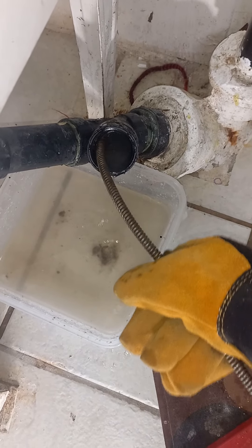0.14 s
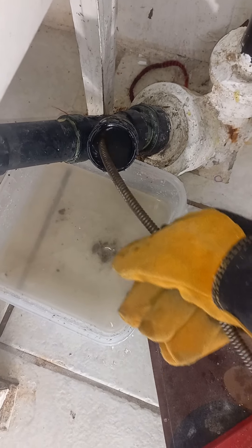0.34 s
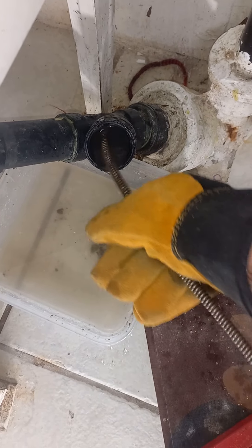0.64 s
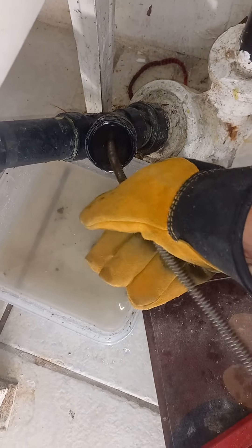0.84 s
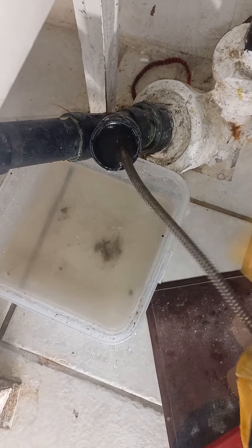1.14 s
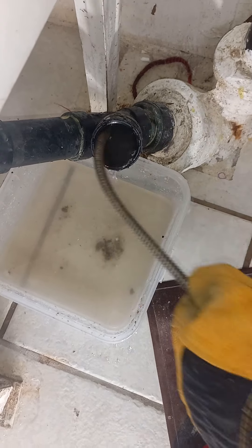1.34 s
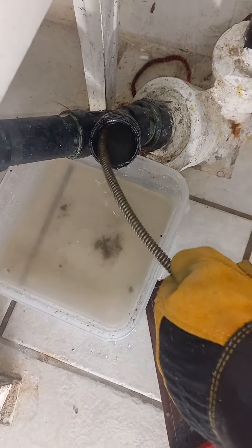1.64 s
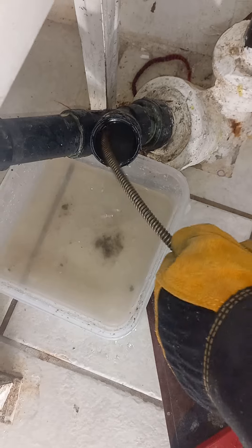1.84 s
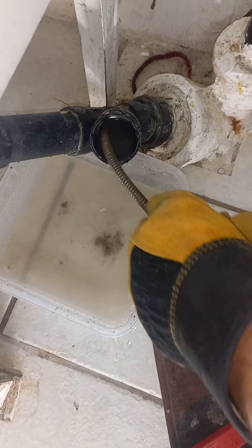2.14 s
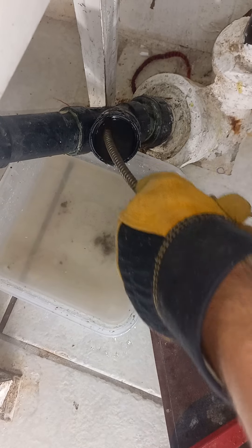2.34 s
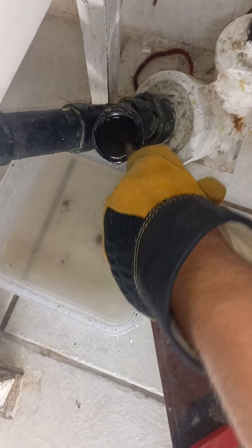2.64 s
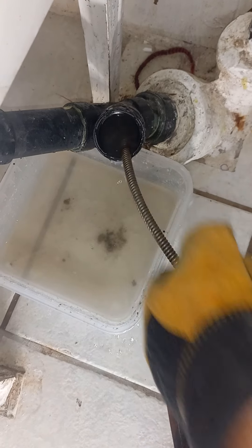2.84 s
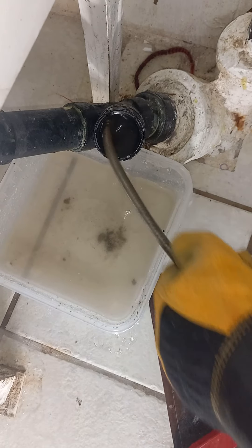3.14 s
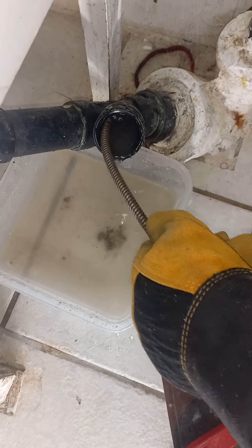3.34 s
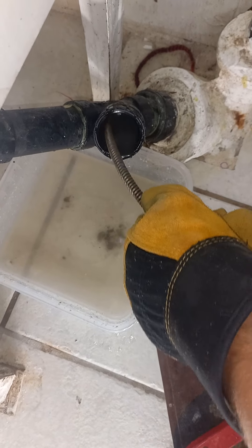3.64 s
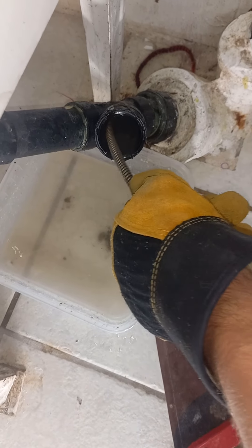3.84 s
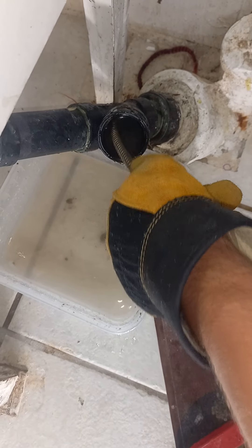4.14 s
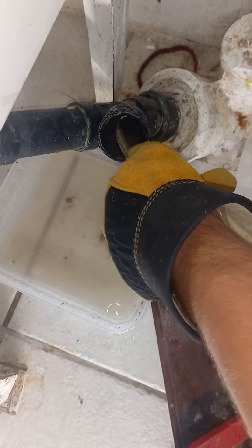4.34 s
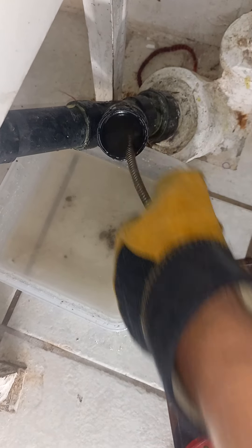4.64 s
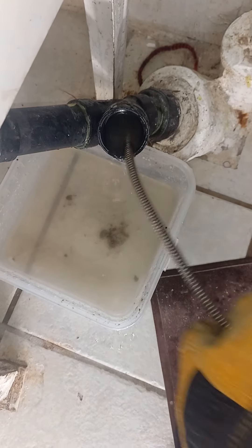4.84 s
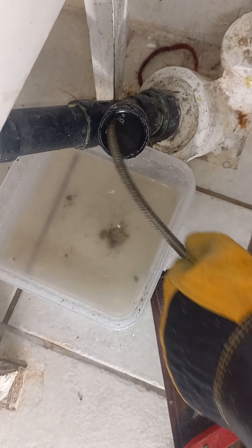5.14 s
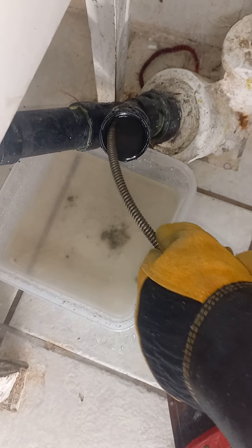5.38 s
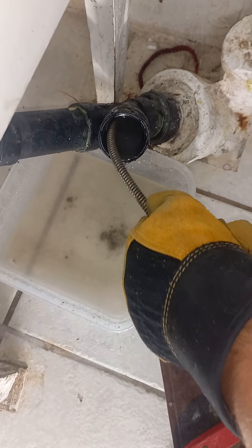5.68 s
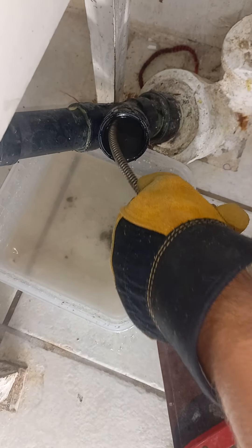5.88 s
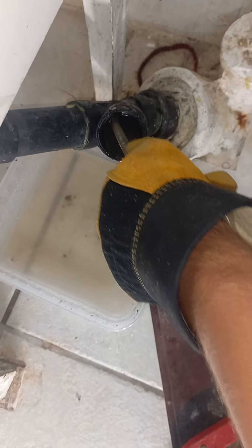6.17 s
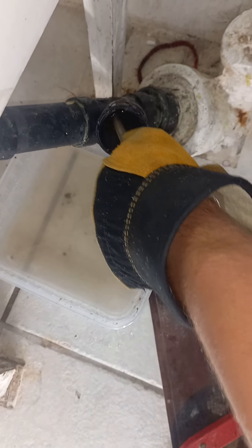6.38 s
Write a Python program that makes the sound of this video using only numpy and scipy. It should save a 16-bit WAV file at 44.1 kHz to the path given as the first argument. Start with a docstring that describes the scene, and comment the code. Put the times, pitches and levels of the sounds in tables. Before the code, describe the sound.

Metallic cable whipping against a hollow pipe mouth about five times a second, dull knocks deeper inside, motor humming, slapping pausing three times.

```python
"""A coiled steel cable, spun by an electric drain cleaner, whips and knocks in an open waste pipe.
About five times a second, with pauses, it slaps the pipe mouth: short noise bursts ring sets of resonances.
Deeper in, such bursts make knocks and floor thuds; random small contacts make the churn and chatter.
Three times the gloved hand moves back for a new grip, and fed coils rasp over the rim as rapid noise ticks.
Wavering sine tones and low noise make the motor and drum; a small tiled room adds short reflections."""
import sys
import numpy as np
from scipy import signal
from scipy.fft import rfft, irfft, next_fast_len
from scipy.io import wavfile
from scipy.ndimage import uniform_filter1d

SR = 44100
rng = np.random.default_rng(int(sys.argv[2]) if len(sys.argv) > 2 else 0)


def materialize(psi):
    """Save the field psi as 16-bit PCM at rate SR to the path in sys.argv[1].

    A 1-D psi becomes a single channel; in a 2-D psi each row is a channel.
    """
    bounded = np.clip(np.atleast_2d(psi).T, -1, 1)
    quanta = np.round(bounded * 32767).astype(np.int16)
    wavfile.write(sys.argv[1], SR, quanta)


N = 287091
TIME = np.arange(N) / SR
BINS = np.fft.rfftfreq(8192, 1 / SR)  # the frequencies at which every body's gain is given


def gain_of(db):
    """Turns decibels into a factor on the amplitude."""
    return 10 ** (np.asarray(db) / 20)


def evened(x):
    """Scales a signal to an rms (average strength) of 1."""
    return x / np.sqrt(np.mean(x ** 2) + 1e-20)


def read(points, hz):
    """Reads a curve between its points, along a logarithmic frequency axis."""
    point_hz, value = np.transpose(points)
    return np.interp(np.log(hz + 1), np.log(point_hz + 1), value)


def add(mix, s, sound):
    """Lays a stereo sound into the mix at time s, cut off where the mix ends."""
    part = mix[:, max(round(s * SR), 0):][:, :sound.shape[1]]
    part += sound[:, :part.shape[1]]


def wander(rate_hz):
    """Makes a slow random curve of rms 1 by smoothing noise above rate_hz."""
    t = np.arange(8192) / 1200
    hz = np.fft.rfftfreq(len(t), t[1])
    smooth = rfft(rng.standard_normal(len(t))) / (1 + (hz / rate_hz) ** 4)
    return np.interp(TIME, t, evened(irfft(smooth)))


def resonances(modes):
    """Gives the gain of a body at each frequency: one steep-sided peak per mode."""
    power = sum(gain_of(db) ** 2 / (1 + ((BINS - hz) / width) ** 2) ** 2 for hz, width, db in modes)
    return np.sqrt(power)


def struck(modes, spread_db):
    """Varies the mode levels at random: the place of a blow favours some and starves others."""
    return resonances([(hz, width, db + spread_db * rng.standard_normal()) for hz, width, db in modes])


def ring(x, gain):
    """Passes x through a body of energy 1 with the given gain; it rings only after it is pushed."""
    # folding the cepstrum gives the filter that responds as early as it can (minimum phase)
    cepstrum = irfft(np.log(np.maximum(gain / gain.max(), 1e-4)))
    folded = 2 * cepstrum[:len(BINS)]
    taps = irfft(np.exp(rfft(folded, len(cepstrum))))[:len(BINS)]
    taps = taps / np.linalg.norm(taps)
    size = next_fast_len(x.shape[1] + len(taps), True)
    return irfft(rfft(x, size) * rfft(taps, size), size)[:, :x.shape[1]]


def contacts(per_s, spread_db):
    """Scatters small impacts of uneven size, each with its own random sign at the two microphones."""
    size = gain_of(spread_db * np.minimum(rng.exponential(1, N), 3))
    happens = rng.random(N) < per_s / SR
    return evened(size * happens * rng.choice([-1, 1], (2, N)))


def skid(gain, rise_s, decay_s, length_s=.09):
    """Makes one blow: a quick noisy flurry of coil contacts rings a body; its strongest 5 ms have rms 1."""
    t = np.arange(round(length_s * SR)) / SR
    envelope = (1 - np.exp(-t / rise_s)) * np.exp(-t / decay_s)
    sound = ring(envelope * rng.standard_normal((2, len(t))), gain)
    sound /= np.linalg.norm(sound, axis=1, keepdims=True)
    strongest = uniform_filter1d((sound ** 2).mean(0), size=220).max()
    return sound / np.sqrt(strongest)


# Resonances of the bodies, also used further below: (frequency [Hz], half-width at half height [Hz], level [dB])
# air and wall of the drain, lower modes
PIPE_MODES = [(257.4, 23.3, -10.5), (360.9, 14.6, -0.5), (397, 13, -1), (439.7, 25.7, 1), (479, 14.4, 2)]
# air in the drain, upper modes
UPPER_PIPE_MODES = [(579, 27, -3), (599.4, 21, 0.5), (664.4, 22, -1.5), (748.6, 38, 1), (820, 45, -10)]
# the pipe mouth
MOUTH_MODES = [(1120, 220, -15), (1373, 35, -0.5), (1550, 75, -5.5), (1817, 75, 4.5), (1943, 29, 8),
               (2018, 34, 4.5), (2167, 111, 0.5)]
# the steel coil on the rim
RIM_MODES = [(2590, 260, -4), (2948, 15, 0), (3215, 92, -4), (3700, 350, -3), (4295, 180, -4.5),
             (4770, 560, -6.5), (5320, 205, -4.5), (6150, 270, -5), (6790, 400, -6.5)]
# colour of the dull bumps: (frequency [Hz], level [dB per Hz])
BUMP_COLOUR = [(60, -28.5), (120, -19), (190, -10), (245, -2.5), (315, -10.5), (380, -3), (470, -4.5),
               (540, -6), (750, -9), (900, -19.5), (1300, -44.5), (2500, -59)]
# colour of the fine rattle: (frequency [Hz], level [dB per Hz])
RATTLE_COLOUR = [(500, -21.5), (900, 4), (1300, -2), (2000, -6), (2450, -9), (3200, -8), (5000, -14.5),
                 (6500, -17), (8000, -34), (10000, -23), (15300, -17), (16300, -40)]
# cable tumbling far down the pipe, before trim and lurch: (time [s], bump level [dB], rattle level [dB])
CHURN_LEVELS = [(0.0, -34, -45), (0.61, -32.5, -43.5), (0.92, -33.5, -45), (1.34, -30.5, -40),
                (1.67, -32, -43), (2.63, -28, -38.5), (2.79, -31.5, -41), (3.06, -29, -42.5),
                (3.28, -29, -40.5), (3.57, -28.5, -43), (4.6, -31, -41), (5.15, -29.5, -41),
                (5.71, -30.5, -42), (6.24, -30, -41.5), (6.51, -32, -38)]
BUMPS_TRIM_DB, RATTLE_TRIM_DB, CHATTER_TRIM_DB = -0.5, 1, -5  # each layer against its level curve


def churn():
    """The long cable tumbles against the pipe wall: dense dull bumps and a fine rattle lurch together."""
    s, bumps_db, rattle_db = np.transpose(CHURN_LEVELS)
    lurch = wander(rate_hz=23.0)
    pipe = 1 + 1.2 * resonances(PIPE_MODES) + 0.34 * resonances(UPPER_PIPE_MODES)
    bumps = evened(ring(contacts(per_s=1500, spread_db=1.5), gain_of(read(BUMP_COLOUR, BINS)) * pipe))
    wall = 1 + 0.41 * resonances(MOUTH_MODES) + .5 * resonances(RIM_MODES)
    rattle = evened(ring(contacts(per_s=5000, spread_db=1.5), gain_of(read(RATTLE_COLOUR, BINS)) * wall))
    bumps_level = gain_of(np.interp(TIME, s, bumps_db) + BUMPS_TRIM_DB + 1.15 * lurch)
    rattle_level = gain_of(np.interp(TIME, s, rattle_db) + RATTLE_TRIM_DB + 2.9 * lurch)
    return bumps * bumps_level + rattle * rattle_level


def chatter():
    """Loose coils tick lightly on the pipe wall, in three sets that each wake their own mix of modes."""
    s, _, rattle_db = np.transpose(CHURN_LEVELS)
    ticks = np.zeros((2, N))
    for _ in range(3):
        touches = contacts(per_s=40, spread_db=6.5)
        wall = struck(MOUTH_MODES, spread_db=8.5) + 0.41 * resonances([(1160, 110, 0)])
        ticks += ring(touches, wall)
    return evened(ticks) * gain_of(np.interp(TIME, s, rattle_db) + CHATTER_TRIM_DB)


# tones of the motor and drum, before trim and wavering: (frequency [Hz], level [dB])
MOTOR_TONES = [(59.7, -68), (120, -53.5), (299, -42.5), (358.5, -43), (390, -38), (479, -36), (572.5, -55)]
# colour of the drum's even rumble: (frequency [Hz], level [dB per Hz])
DRUM_COLOUR = [(25, -30), (42, -29), (56, -1), (70, -5), (88, 4), (140, 0), (175, 0), (260, 0.5),
               (400, -31.5)]


def motor():
    """Hum and drum tones waver at random, as with the load on the cable, over the drum's even rumble."""
    # one shared, slightly uneven clock bends all the tones together
    clock = np.cumsum(1 + 0.0041 * wander(rate_hz=4.12)) / SR
    rumble = evened(ring(rng.standard_normal((2, N)), gain_of(read(DRUM_COLOUR, BINS))))
    out = gain_of(-47.0) * rumble
    for hz, db in MOTOR_TONES:
        phase = 2 * np.pi * (hz * clock + rng.random((2, 1)))
        level = gain_of(db - 4.0 + 4.67 * wander(rate_hz=21))
        out += np.sqrt(2) * level * np.sin(phase)
    return out


LIGHT_KNOCKS_PER_S, LIGHT_THUMP_DB, LIGHT_CLACK_DB, LIGHT_SPREAD_DB = 7, -27.5, -36, 2


def light_knocks():
    """Draws small knocks in the columns of HARD_KNOCKS: one at a random moment in each short stretch."""
    chance, thump, clack = rng.random(80), rng.standard_normal(80), rng.standard_normal(80)
    s = (np.arange(len(chance)) + chance) / LIGHT_KNOCKS_PER_S
    thump_db = LIGHT_THUMP_DB + LIGHT_SPREAD_DB * thump
    clack_db = LIGHT_CLACK_DB + LIGHT_SPREAD_DB * clack
    rows = np.transpose([s, thump_db, clack_db])
    return list(rows[s < N / SR])


# the cable knocks hard inside the pipe; levels before the trims below:
# (time [s], level of the air column's thump [dB], level of the wall's clack [dB])
HARD_KNOCKS = [(0.045, -20.5, -50), (0.131, -12, -23.5), (0.328, -17, -25), (0.507, -17.5, -24.5),
               (0.527, -15, -24.5), (0.663, -21, -33), (0.738, -19, -31), (0.918, -24, -42),
               (0.936, -18.5, -29), (1.081, -18, -26), (1.14, -20.5, -33), (1.287, -13, -30),
               (1.342, -19, -24.5), (1.475, -21.5, -29), (1.516, -16, -49), (1.728, -12.5, -21.5),
               (1.923, -14, -37), (2.078, -16, -32), (2.157, -24, -25), (2.304, -15.5, -34),
               (2.492, -15, -24), (2.572, -13, -19), (2.644, -27, -28.5), (2.718, -15.5, -21),
               (2.931, -18.5, -38), (3.096, -10.5, -21), (3.245, -34, -28.5), (3.294, -15, -25),
               (3.339, -12, -32), (3.365, -18, -25), (3.495, -16, -29), (3.57, -16, -20.5),
               (3.725, -16.5, -27.5), (3.766, -18.5, -26), (3.904, -14, -24.5), (3.935, -10, -24.5),
               (4.116, -14.5, -30.5), (4.323, -13.5, -18.5), (4.379, -16, -24.5), (4.576, -16, -18),
               (4.612, -29, -26), (4.666, -35, -28), (4.748, -19.5, -34.5), (4.938, -13, -31),
               (5.115, -15, -21), (5.168, -15.5, -28), (5.35, -13.5, -30.5), (5.378, -12.5, -33),
               (5.55, -16.5, -44), (5.588, -18, -45), (6.187, -23, -35), (6.385, -16, -25),
               (6.409, -42, -17.5)]
# the upper air modes lie between thump and clack (share 0-1), then get a trim
HOLLOW_DB, HOLLOW_FROM_CLACK = -3.5, 0.34


def knocks():
    """Blows deeper in the drain ring the air column; the pipe wall clatters and the cable bounces once."""
    out = np.zeros((2, N))
    broad = resonances([(976, 284, 1.5), (2610, 660, -7.5), (5860, 2000, -17.5)])
    for s, thump_db, clack_db in list(HARD_KNOCKS) + light_knocks():
        air = struck(PIPE_MODES, spread_db=2.5) + 0.083 * resonances([(380, 138, 0)])
        thump = skid(air, rise_s=0.00058, decay_s=0.0025)
        hollow_db = HOLLOW_DB + thump_db + HOLLOW_FROM_CLACK * (clack_db - thump_db)
        hollow = skid(struck(UPPER_PIPE_MODES, spread_db=2), rise_s=0.00029, decay_s=.003)
        add(out, s - .003, gain_of(thump_db - 4) * thump + gain_of(hollow_db) * hollow)

        wall = struck(MOUTH_MODES, spread_db=7.0) + gain_of(-1.5) * broad
        wall = wall + gain_of(-24.0) * struck(RIM_MODES, spread_db=8.5)
        clack = gain_of(clack_db + 1.04) * skid(wall, rise_s=0.00028, decay_s=0.0062)
        add(out, s - .0005, clack)
        # the bounce is softer, with left and right swapped
        add(out, s + rng.uniform(.008, .022), gain_of(-9.5) * clack[::-1])
    return out


# colour of the sizzling coils: (frequency [Hz], level [dB per Hz])
SIZZLE_COLOUR = [(3000, -56), (5500, -42), (7000, -17.5), (8000, -14), (9400, -10), (10100, -7.5),
                 (11400, -12), (12300, -5), (13200, -1.5), (14400, -6), (15100, 2), (15550, 0),
                 (15950, -17), (16600, -30)]
SIZZLE_DB = -3.5  # sizzle of the coils against the level of the slap
CLACK_DB, RING_DB, RIM_HIT_RING_DB = -26.5, -20.5, -4  # at a usual slap; a rim hit rings the mouth less
# a harder slap is brighter: rim and mouth gain less than the sizzle (dB per dB above a usual slap)
USUAL_SLAP_DB, CLACK_SLOPE, RING_SLOPE = -18, .65, 0.79
SKID_LENGTH, SKID_SHORTER_PER_DB = 0.79, 0.09  # factor on decay at a usual slap; a harder one is shorter


def slap(sizzle_db, square_db, ring_db):
    """The cable skids on the rim: coils sizzle, the rim clacks, the pipe mouth rings."""
    out = np.zeros((2, SR // 7))
    force_db = sizzle_db - USUAL_SLAP_DB
    length = np.clip(SKID_LENGTH - SKID_SHORTER_PER_DB * force_db, .5, 2)
    # each touch falls on another stretch of coils, with its own colour
    spot_db = np.interp(BINS, np.linspace(0, SR / 2, 24), rng.normal(0, 2.2, 24))
    coils = gain_of(read(SIZZLE_COLOUR, BINS) + spot_db)
    sizzle = gain_of(sizzle_db + SIZZLE_DB) * skid(coils, rise_s=0.0011, decay_s=0.006 * length)
    rim = struck(RIM_MODES, spread_db=3.5)
    clack_level = gain_of(CLACK_DB + CLACK_SLOPE * force_db + square_db)
    clack = clack_level * skid(rim, rise_s=0.0031, decay_s=0.0086 * length)
    mouth = struck(MOUTH_MODES, spread_db=3)
    mouth_level = gain_of(ring_db + RING_SLOPE * force_db)
    mouth_ring = mouth_level * skid(mouth, rise_s=0.00089, decay_s=0.01 * length)
    add(out, 0, sizzle + clack + mouth_ring)
    # the springy cable touches once more, more dully, with left and right swapped
    bounce_s, bounce_db = rng.uniform(.014, .034), rng.normal(-17.5, 7)
    bounce = (0.14 * sizzle + clack + mouth_ring)[::-1]
    add(out, bounce_s, gain_of(bounce_db) * bounce)
    return out


# glancing slaps on the pipe mouth, and three light coil ticks before the first pull:
# (time [s], level before the sizzle trim [dB], extra ring of the pipe mouth [dB])
MOUTH_TOUCHES = [(0.1369, -19.5, -0.5), (0.3025, -20.5, -2), (0.5502, -16, -5.5), (1.165, -33.5, -9),
                 (1.2055, -34.5, -10), (1.2378, -27.5, -4), (1.4729, -18.5, -0.5), (1.6936, -20.5, -1),
                 (1.9019, -19, -1), (2.0903, -14, 0.5), (2.2919, -17, -1), (2.5019, -17, -1),
                 (3.0919, -20, 3.5), (3.2992, -17.5, -4), (3.483, -14, 0.5), (3.5977, -23, -4),
                 (3.699, -15.5, -2), (3.895, -18, -4), (4.0956, -18, -4.5), (4.3051, -18.5, -5.5),
                 (5.102, -17, 1), (5.293, -22, 6), (5.4931, -14, 1), (5.697, -17.5, 0), (5.896, -18.5, -3),
                 (6.0969, -15.5, 0.5), (6.303, -18, -1), (6.5044, -18, 1)]
# mostly some 60 ms later it swings back and lands more squarely on the rim;
# a few faint later touches and one extra hard hit near the end:
# (time [s], level before the sizzle trim [dB], extra clack of the rim [dB])
RIM_HITS = [(0.347, -18, 0), (1.5574, -17.5, -2), (1.7472, -22.5, -3), (1.963, -23, -2.5),
            (2.217, -33, -4.5), (2.3603, -22, 2.5), (2.4254, -32.5, -3), (2.5625, -18.5, 4.5),
            (3.3558, -29.5, 1), (3.559, -14, 0.5), (3.7396, -26, 3), (3.9569, -20.5, 3), (4.1628, -19, 4),
            (4.2232, -34.5, 0), (4.3678, -16.5, 4), (5.242, -30.5, -3), (5.3634, -13, -1), (5.5637, -12, 3),
            (5.7556, -28.5, 3.5), (5.9663, -18, -0.5), (6.1723, -21, 0), (6.361, -21.5, -3),
            (6.4081, -12.5, 10)]


def slaps():
    """The cable gives glancing, ringing slaps and a few light ticks on the pipe mouth, and drier rim hits."""
    out = np.zeros((2, N))
    for s, db, extra_ring_db in MOUTH_TOUCHES:
        add(out, s - .0007, slap(db, 0, RING_DB + extra_ring_db))
    for s, db, extra_clack_db in RIM_HITS:
        add(out, s - .0007, slap(db, extra_clack_db, RING_DB + RIM_HIT_RING_DB))
    return out


# the slack cable flops on the floor: (time [s], level before a trim [dB], pitch of the boom [Hz])
FLOOR_THUDS = [(1.094, -26.5, 87), (1.277, -22, 248), (1.54, -30, 260), (2.641, -27.5, 236),
               (2.729, -23.5, 192), (3.549, -30, 250), (4.587, -18, 202), (4.607, -22.5, 149),
               (4.804, -21.5, 213), (5.049, -17.5, 244)]
# colour of the floor under a thud: (frequency [Hz], level [dB per Hz])
FLOOR_COLOUR = [(35, -35), (60, -7), (95, -13), (170, -1), (250, -10), (340, 7), (700, -38)]


def thuds():
    """A loop of slack cable drops on the floor: a soft, low push and a short boom."""
    out = np.zeros((2, N))
    floor = gain_of(read(FLOOR_COLOUR, BINS))
    for s, db, hz in FLOOR_THUDS:
        boom = floor + 2.0 * resonances([(hz, 22, 0)])
        thud = skid(boom, rise_s=0.0023, decay_s=0.012, length_s=0.27)
        add(out, s - .004, gain_of(db - 5.5) * thud)
    return out


# coils dragged over the rim, level before each body's trim:
# (time [s], length [s], level of the rasp [dB], fade time constant [s])
COIL_PULLS = [(1.272, 0.089, -24, 0.032), (3.082, 0.11, -29.5, 0.079), (5.014, 0.16, -25.5, 0.0078)]
PULL_ATTACK_S, PULL_UNEVEN_DB = 0.031, 1.2  # the rasp swells quickly and catches as it goes


def pulls():
    """Coil after coil ticks over the rim, fast and unevenly, so that the ticks merge to a rasp."""
    level = np.zeros(N)
    for s, length_s, db, release_s in COIL_PULLS:
        swell = np.clip((TIME - s) / PULL_ATTACK_S, 0, 1)
        fade = np.exp(-np.maximum(TIME - s - length_s, 0) / release_s)
        level += gain_of(db) * swell * fade
    # around 110 coils a second; each tick starts sharply and sinks back into a steady rasp
    coils_passed = np.cumsum(110 * np.exp(0.38 * wander(rate_hz=25))) / SR
    tick_shape = .45 + np.exp(-(coils_passed % 1) / .35)
    ticks = evened(tick_shape * gain_of(2 * wander(rate_hz=70)))
    catching = gain_of(PULL_UNEVEN_DB * wander(rate_hz=35))
    force = level * catching * ticks * rng.standard_normal((2, N))
    # the same force rings every body it reaches
    coils = gain_of(-4.5) * ring(force, gain_of(read(SIZZLE_COLOUR, BINS)))
    rim = gain_of(-2.5) * ring(force, resonances(RIM_MODES) + 0.051 * resonances([(4500, 3400, 0)]))
    mouth = gain_of(-0.5) * ring(force, resonances(MOUTH_MODES) + 0.58 * resonances([(1200, 220, 0)]))
    upper_pipe = gain_of(-2.5) * ring(force, resonances(UPPER_PIPE_MODES))
    pipe = gain_of(-1.5) * ring(force, resonances(PIPE_MODES))
    return coils + rim + mouth + upper_pipe + pipe


def spring(x):
    """The long steel coil rings on briefly in a ladder of close modes, the same at every touch."""
    t = np.arange(SR // 16) / SR
    hz = np.linspace(2600, 15700, 64)[:, None] + rng.uniform(-70, 70, (64, 1))
    phase = 2 * np.pi * rng.random((2, len(hz), 1))
    fade = gain_of(-60 * t / 0.047)  # down 60 dB after 47 ms
    tail = (np.sin(2 * np.pi * hz * t + phase) * fade).sum(1)
    tail /= np.linalg.norm(tail, axis=1, keepdims=True)
    return signal.oaconvolve(x, tail, axes=1)[:, :N]


# how long the tiled room rings: (frequency [Hz], time to fall by 60 dB [s])
ROOM_DECAY = [(200, 0.18), (2000, 0.19), (6000, 0.22), (14000, 0.15)]


def room(x):
    """Dense random reflections off tiles, each frequency band dying at its own speed."""
    taps = rng.standard_normal((2, SR // 2)) * (rng.random((2, SR // 2)) < 3000 / SR)
    hz, t, bands = signal.stft(taps, SR, nperseg=256)
    fade = gain_of(-60 * t / read(ROOM_DECAY, hz)[:, None])
    tail = signal.istft(bands * fade, SR, nperseg=256)[1]
    # silent for the first 3.7 ms, then fading in over the next 3.7 ms
    tail *= np.clip(np.arange(tail.shape[1]) / SR / 0.0037 - 1, 0, 1)
    tail /= np.linalg.norm(tail, axis=1, keepdims=True)
    return signal.fftconvolve(x, tail, axes=1)[:, :N]


def scene():
    """The pipe mouth is near and fairly dry; the knocks come with more of the room."""
    near = slaps() + pulls()
    deep = knocks() + thuds() + chatter()
    near = gain_of(-0.83) * near + gain_of(-8) * spring(near)
    wet = room(gain_of(-14.0) * near + gain_of(-7.0) * deep)
    return near + deep + wet + churn() + motor()


# level between the two microphones: (frequency [Hz], left minus right [dB])
MIC_BALANCE = [(100, -1), (250, 2.5), (330, -6), (480, 4.5), (800, 2), (1200, 1), (1850, -8), (2600, -1.5),
               (5200, 3), (6800, -4.5), (8500, -9), (15000, -5.5)]
# how alike the two microphones are: (frequency [Hz], likeness [1 = the same, 0 = unrelated])
MIC_LIKENESS = [(100, 0.9), (290, 0.97), (640, 0.58), (1000, 0.16), (1500, 0.065), (8000, 0.17)]
LEFT_LAG_S = .0002  # the left microphone is a little farther from the drain
EDGE_HZ = 16600  # upper band limit


def record(dry):
    """Two microphones that agree in the bass and differ in the treble; rounded peaks; then the band limit."""
    size = next_fast_len(N, True)
    hz = np.fft.rfftfreq(size, 1 / SR)
    first, second = rfft(dry, size)
    same = np.clip(read(MIC_LIKENESS, hz), -1, 1)
    mid = first * np.sqrt((1 + same) / 2)
    side = second * np.sqrt((1 - same) / 2)
    lean = gain_of(read(MIC_BALANCE, hz))
    lag = np.exp(-2j * np.pi * hz * LEFT_LAG_S)
    # the last factor keeps the power of the pair whichever way it leans
    pair = np.array([(mid + side) * lean * lag, mid - side]) * np.sqrt(2 / (1 + lean ** 2))
    bass_cut = 1 / np.sqrt(1 + (45 / (hz + 1)) ** 4)
    sound = irfft(pair * bass_cut, size)[:, :N]
    rounded = sound / (1 + (sound ** 2 / .8) ** 2) ** .25
    low_pass = signal.firwin(511, EDGE_HZ, window=("kaiser", 9), fs=SR)
    return signal.oaconvolve(rounded, low_pass[None], "same")


dry = scene()
out = record(dry)
materialize(out)
```